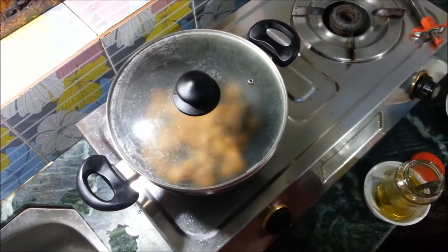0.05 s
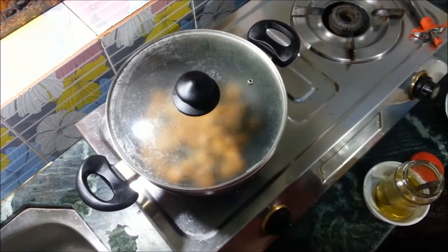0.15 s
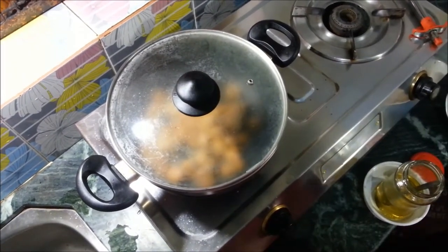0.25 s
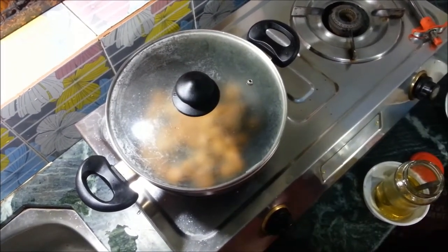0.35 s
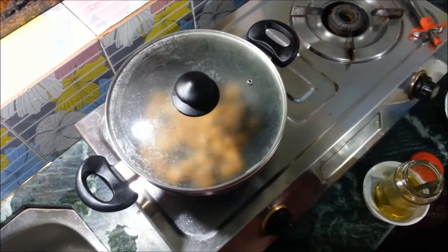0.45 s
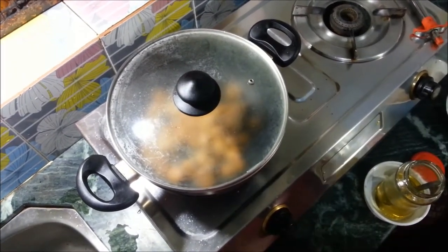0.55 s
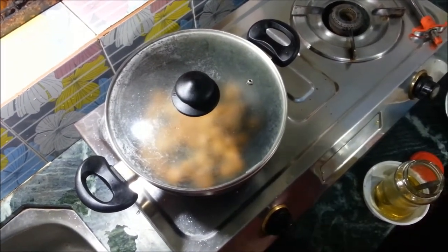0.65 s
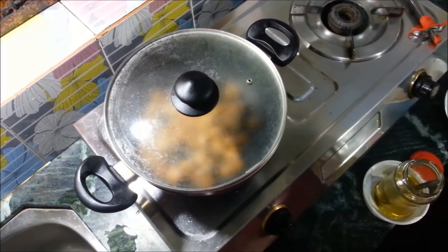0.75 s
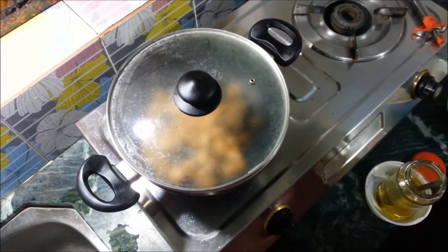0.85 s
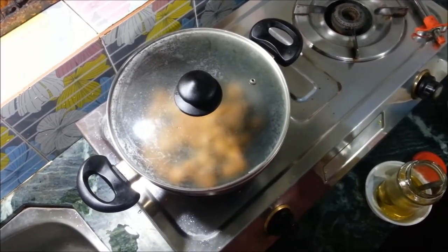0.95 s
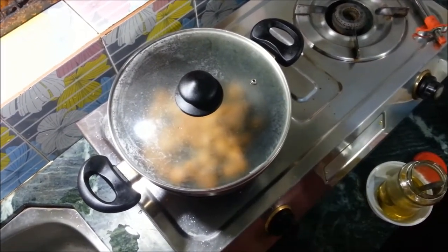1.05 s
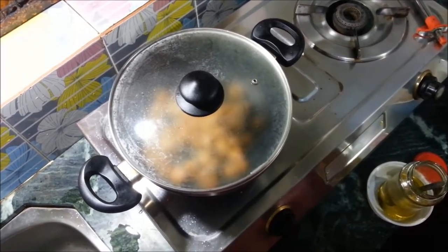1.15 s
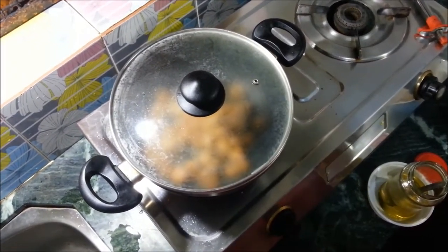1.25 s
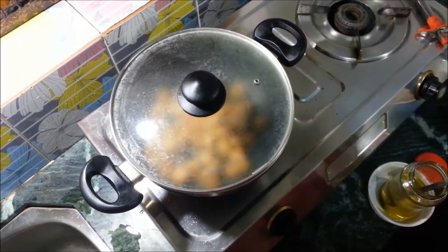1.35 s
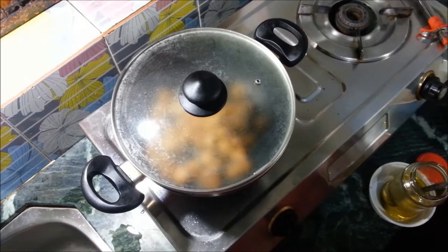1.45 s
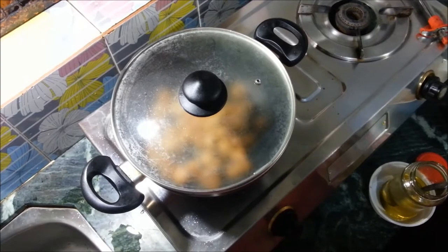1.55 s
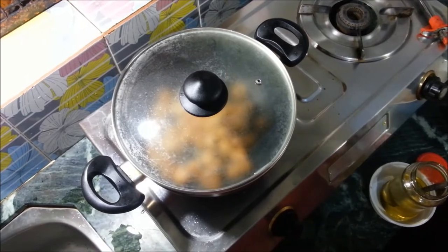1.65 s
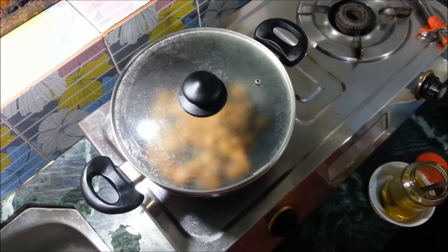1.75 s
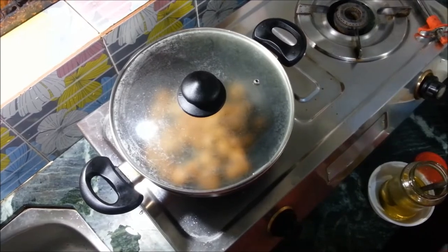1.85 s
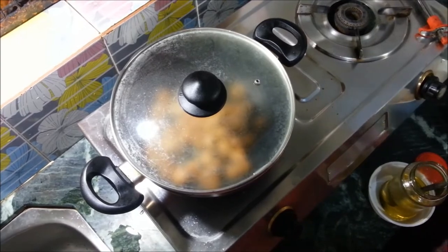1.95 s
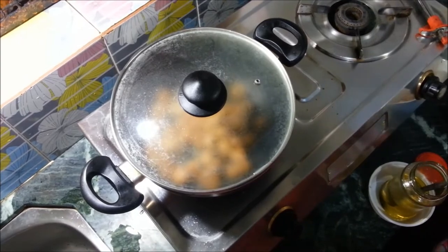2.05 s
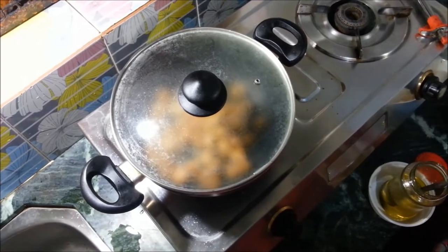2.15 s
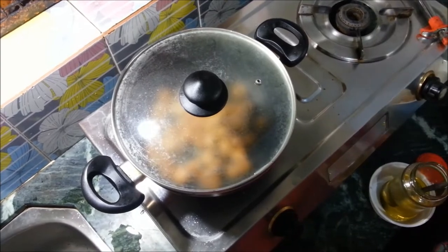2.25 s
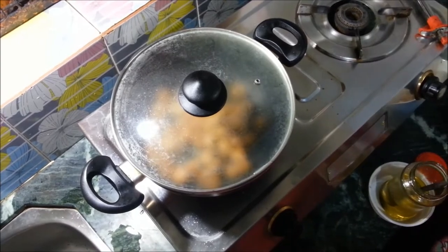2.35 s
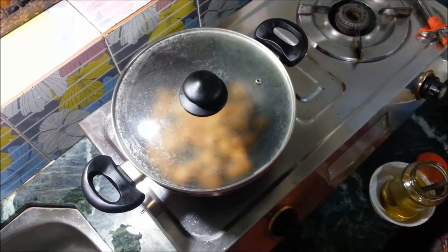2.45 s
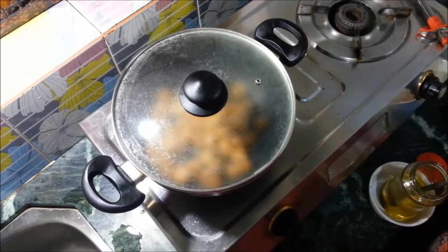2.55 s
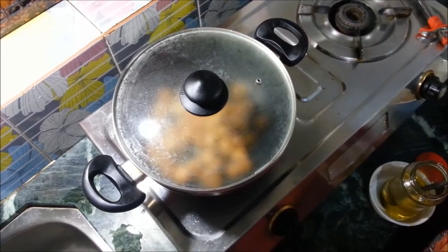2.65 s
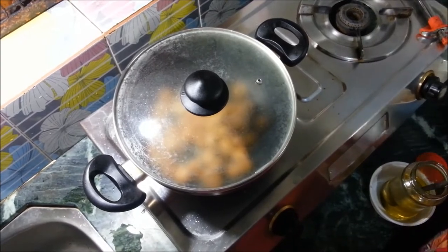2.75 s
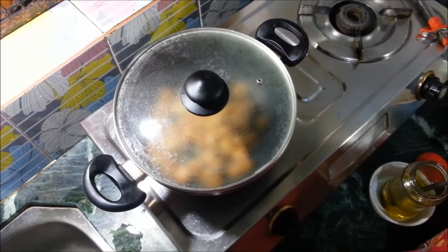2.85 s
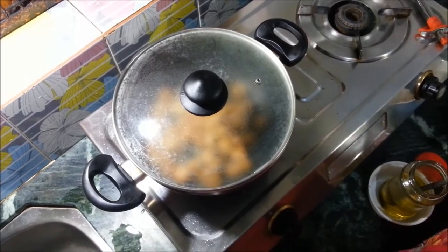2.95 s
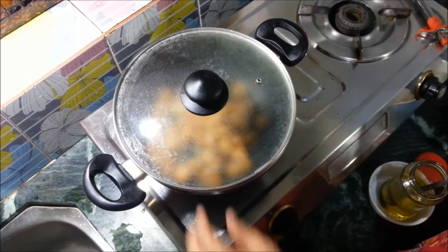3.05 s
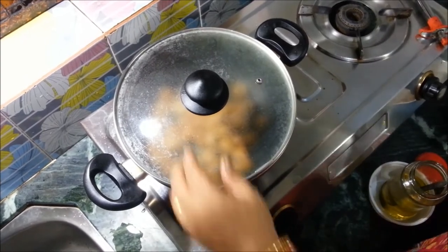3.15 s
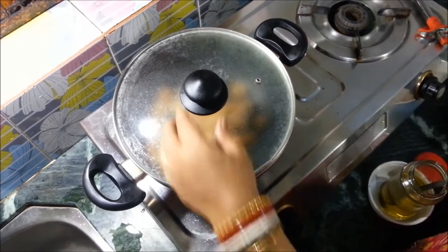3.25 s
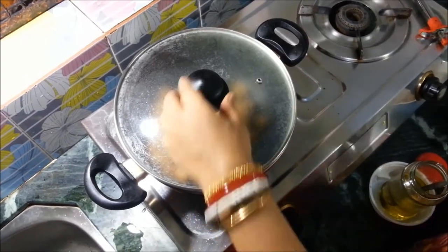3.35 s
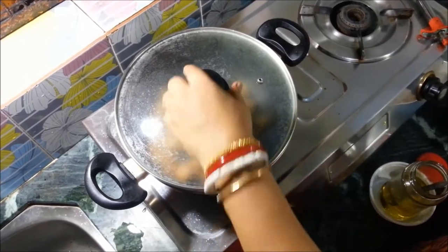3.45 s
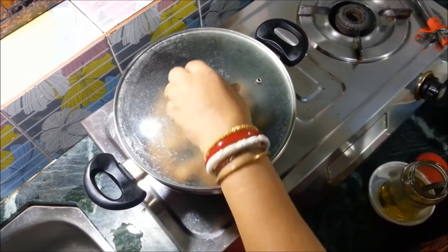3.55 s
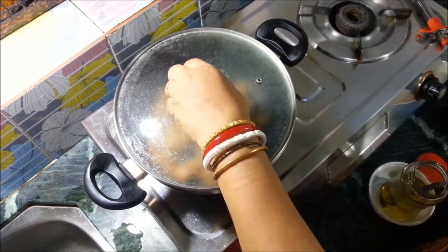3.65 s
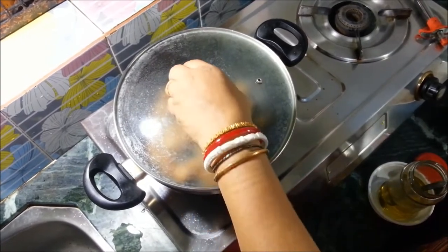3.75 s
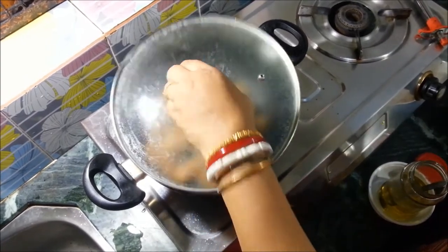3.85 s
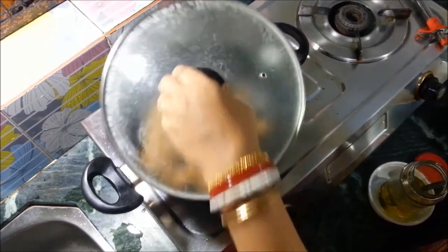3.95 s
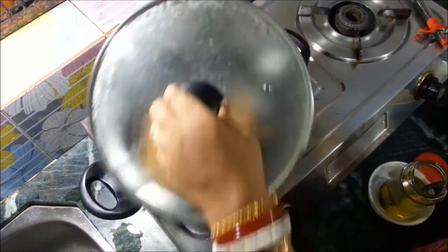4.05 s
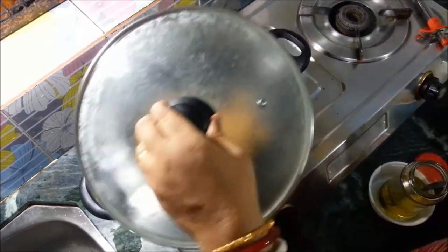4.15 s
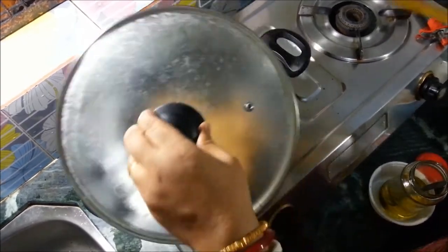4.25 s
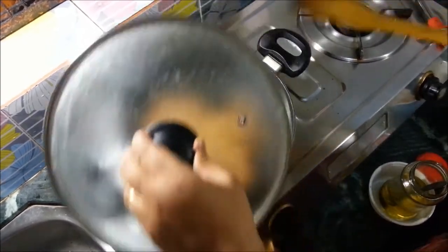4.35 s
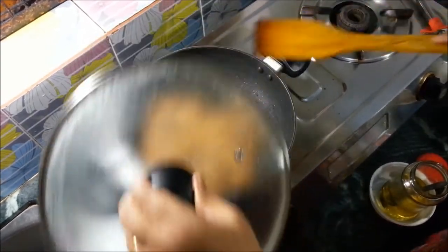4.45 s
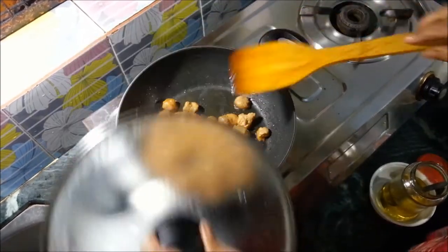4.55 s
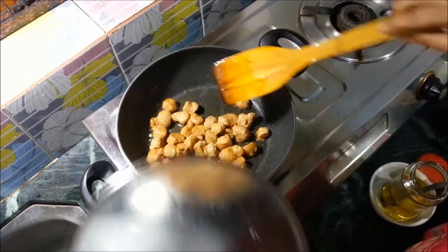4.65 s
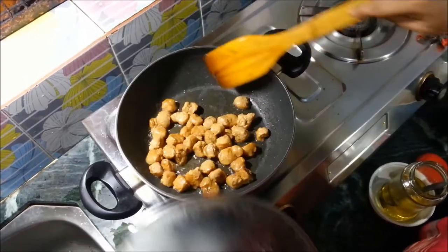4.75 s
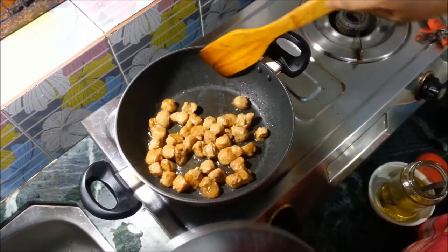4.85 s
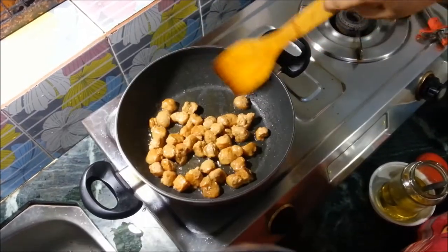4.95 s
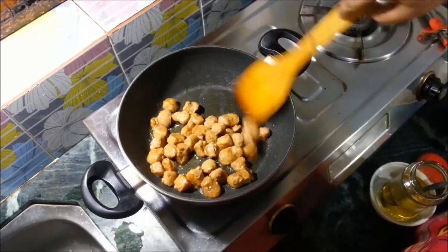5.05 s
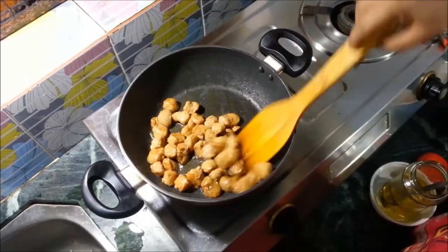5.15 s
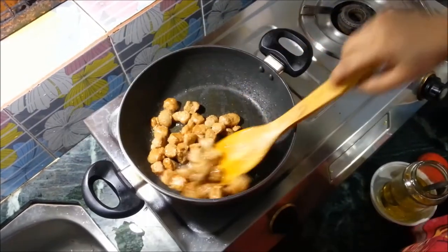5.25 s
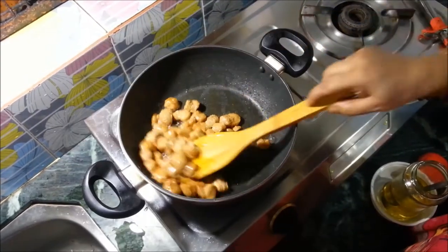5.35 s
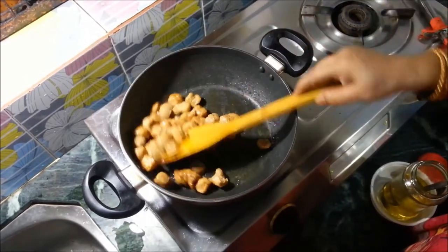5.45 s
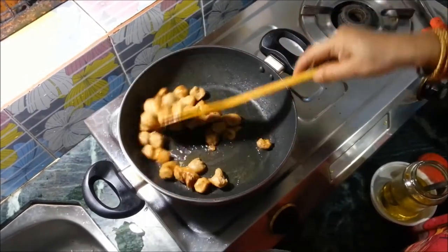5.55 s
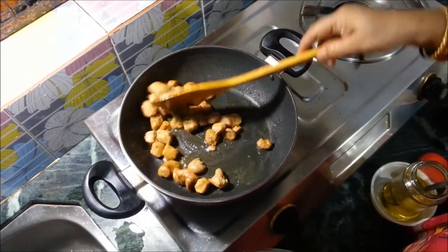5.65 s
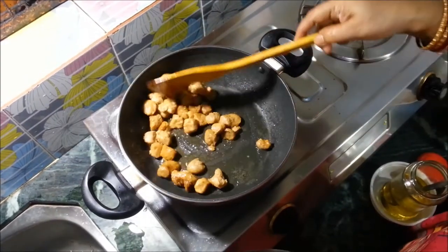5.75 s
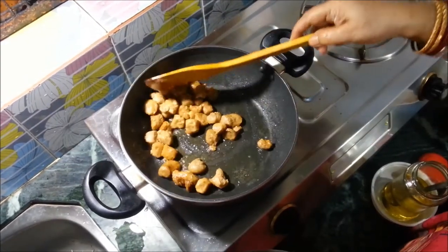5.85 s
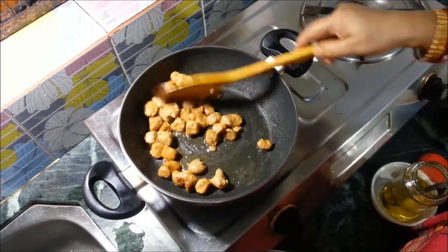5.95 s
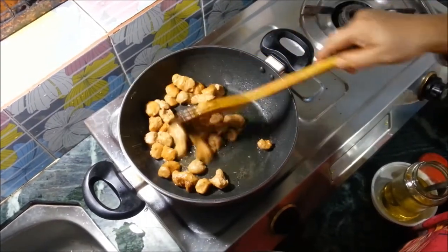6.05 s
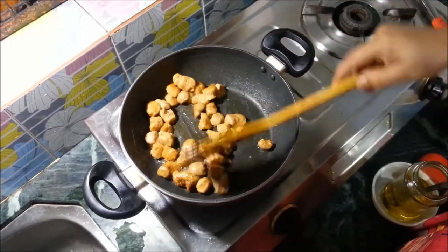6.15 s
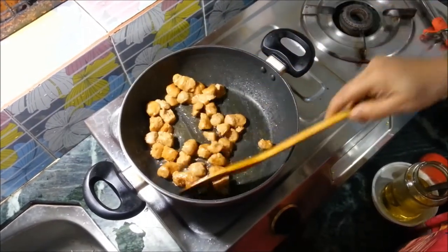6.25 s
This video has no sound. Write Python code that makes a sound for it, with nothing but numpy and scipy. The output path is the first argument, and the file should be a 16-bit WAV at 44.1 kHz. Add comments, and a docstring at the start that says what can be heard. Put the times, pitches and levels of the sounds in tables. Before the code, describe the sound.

From 0 to about 3.8 seconds, food fries under a glass lid, close to the microphone in a small tiled kitchen. The sizzle is low and enclosed, with a hollow bubbling resonance, irregular crisp spits, tiny pops and occasional short puffs of steam. A gas flame murmurs softly below, with faint low hum. At about 3.9 the trapped air sounds hollow and sweeps upward in pitch; around 4.0 to 4.2 the rim scrapes and the dome rings dull and brief. The sizzle opens up, louder and brighter, with hard snaps, the sharpest near 4.7 and 5.05. From about 4.9 to the end at 6.3, a wooden spatula knocks and rubs the pan in uneven strokes, chunks tumble, the stove top gives soft low booms, and the sizzle flares with each push. After 5.2 the flame murmur fades away.

```python
"""Soya chunks fry in shallow oil on a gas stove in a small tiled kitchen, close to a two-port microphone.
From the start, oil fizzes and spits under the glass lid: random pops and noise, over a filtered-noise flame.
Near 4 s the air under the lid rises in pitch, the rim scrapes, the dome rings and the sizzle opens up.
From about 5 s a wooden spatula knocks and rubs the pan, soft booms come from the stove top, and the sizzle
flares with each push; the flame's murmur sinks away after 5.2 s."""
import sys
import numpy as np
from scipy import signal
from scipy.fft import rfft, irfft
from scipy.io import wavfile
from scipy.ndimage import uniform_filter1d, minimum_filter1d

SR = 44100
rng = np.random.default_rng(int(sys.argv[2]) if len(sys.argv) > 2 else 0)


def inscribe(sig):
    """Save sig as 16-bit PCM at rate SR to the path in sys.argv[1].

    A 1-D sig is mono; a 2-D sig holds one channel per row.
    Samples are clipped to [-1, 1] before scaling.
    """
    pcm = np.round(np.clip(np.atleast_2d(sig).T, -1, 1) * 32767)
    wavfile.write(sys.argv[1], SR, pcm.astype(np.int16))


N = 278712
TIME, FREQS = np.arange(N) / SR, np.fft.rfftfreq(N, 1 / SR)


def amp(db):
    """Decibels to gain."""
    return 10 ** (np.asarray(db) / 20)


def unit(x):
    """Scales to an rms of one."""
    return x / np.sqrt(np.mean(x ** 2) + 1e-20)


def curve(rows, axis=1):
    """One column of a time table, at every sample."""
    rows = np.asarray(rows)
    return np.interp(TIME, rows[:, 0], rows[:, axis])


def spectrum(points, hz=FREQS):
    """Reads a table over log frequency."""
    f, value = np.transpose(points)
    return np.interp(np.log(hz + 1), np.log(f), value)


def shaped(x, response):
    """Filters by a frequency response."""
    return irfft(rfft(x) * response, N)


def resonance(hz, width_hz, at=FREQS):
    """Response of one damped resonance, with gain one at its centre."""
    return 1j * at * width_hz / (hz ** 2 - at ** 2 + 1j * at * width_hz)


def ring(x, modes, together=False):
    """Rings a set of modes, all by the same blows or each at its own moments."""
    total = 0
    for k, (hz, width_hz, db) in enumerate(modes):
        drive = (-1) ** k * x if together else np.roll(x, rng.integers(N), -1)
        total = total + amp(db) * shaped(drive, resonance(hz, width_hz))
    return unit(total)


def glide(x, hz, width_hz):
    """A steep resonance that follows a pitch curve: shift down to 0 Hz, low-pass, shift back."""
    turn = np.exp(2j * np.pi * np.cumsum(hz) / SR)
    r = np.exp(-np.pi * width_hz / SR)
    smooth = signal.lfilter([(1 - r) ** 2], [1, -2 * r, r * r], x / turn)
    return unit((turn * smooth).real)


def drift(rate_hz):
    """Random wandering of rms one."""
    return unit(shaped(rng.standard_normal(N), np.exp(-(FREQS / rate_hz) ** 2)))


def noise_pair(likeness):
    """White noise at the two ports, partly shared."""
    a, b = rng.standard_normal((2, N))
    return np.array([a, likeness * a + np.sqrt(1 - likeness ** 2) * b])


def add(mix, s, sound):
    """Mixes a stereo sound in at a time."""
    part = mix[:, max(round(s * SR), 0):][:, :sound.shape[1]]
    part += sound[:, :part.shape[1]]


def swells(times, fades, levels_db, rise):
    """Gain of overlapping swells: each power builds up to its peak, then dies away exponentially."""
    t = TIME[::32]
    u = (t[:, None] - times) / np.maximum(fades, .002)
    power = amp(levels_db) ** 2 * np.exp(-np.where(u < 0, (u / rise) ** 2, u))
    return np.interp(TIME, t, np.sqrt(power.sum(1) + 1e-16))


def flurries(per_s, decay_s, strength):
    """Gain of a bubbling spot: it flares at random moments and dies down."""
    kicks = np.minimum(rng.exponential(1, N), 3) * (rng.random(N) < per_s / SR)
    activity = signal.lfilter([1], [1, -np.exp(-1 / (decay_s * SR))], kicks)
    return unit(np.sqrt(1 + strength * activity))


def contacts(per_s, decay_s):
    """Gain of a run of tiny separate contacts: each starts at once and dies quickly."""
    kicks = rng.uniform(0.47, 1, N) * (rng.random(N) < per_s / SR)
    power = signal.lfilter([1], [1, -np.exp(-1 / (decay_s * SR))], kicks ** 2)
    return unit(np.sqrt(power + 1e-6))


def scatter(decay_s, wall, size=700):
    """Paths from one spot in the pan to the two ports: a first arrival, then reflections off the wall."""
    t = np.arange(size) / SR
    paths = rng.standard_normal((2, size)) * (np.exp(-t / decay_s) + wall * np.exp(-t / 0.0061))
    return paths / np.linalg.norm(paths, axis=1, keepdims=True)


# reverberation of the tiled room: (frequency [Hz], t60 [s])
ROOM_T60 = [(200, 0.077), (1000, 0.41), (4000, 0.19), (8000, 0.14), (15000, 0.16)]


def kitchen(x, wet_db, count=3):
    """Adds the short tail of the tiled room; tails take turns, so pops at different moments differ in path."""
    wet = np.zeros((2, N))
    for k in range(count):
        hz, t, z = signal.stft(rng.standard_normal((2, SR // 3)), SR, nperseg=256)
        decay = amp(-60 * t / spectrum(ROOM_T60, hz)[:, None]) * (t > .004)
        tail = signal.istft(z * decay, SR, nperseg=256)[1]
        turn = uniform_filter1d(1. * (np.arange(N) // 128 % count == k), size=32)
        wet += signal.oaconvolve(x * turn, tail / np.linalg.norm(tail[0]), axes=1)[:, :N]
    return x + amp(wet_db) * wet


# how far the pan is uncovered: (time [s], share [0-1])
OPENING = [(0, 0), (3.87, 0), (3.97, 0.3), (4.3, 0.56), (4.6, 0.46), (6.32, 0.73)]


def opening():
    """Uncovered share of the pan, which blends covered and open sound."""
    return np.clip(curve(OPENING), 0, 1)


def crackle(per_s, spread_db, tone_db, count=20):
    """Spots in the pan, each popping tiny bubbles of its own pitch in flurries."""
    out = np.zeros((2, N))
    for hz in np.geomspace(2400, 13000, count):
        size = amp(spread_db * np.minimum(rng.exponential(1, N), 3))
        pops = size * (rng.random(N) < per_s / count / SR)
        pops = pops * flurries(per_s=14, decay_s=0.0037, strength=5.8)
        pops = pops + amp(tone_db) * signal.lfilter(*signal.iirpeak(hz, 4, SR), pops)
        out += signal.oaconvolve(unit(pops)[None], scatter(decay_s=0.00028, wall=0.48), axes=1)[:, :N]
    return unit(out)


MIST_EDGE_HZ, MIST_DB = 9750, -3.5  # lower edge; level against the crackle


def mist():
    """The finest droplets hiss high up, in puffs of their own."""
    hiss = unit(shaped(noise_pair(.05), 1 / (1 + (MIST_EDGE_HZ / (FREQS + 1)) ** 8)))
    return amp(MIST_DB) * hiss * flurries(per_s=29, decay_s=0.0082, strength=19)


# steady sizzle before colouring: (time [s], relative level [dB])
STEADY_SIZZLE = [(0, -34), (0.8, -33), (1.7, -35.5), (3.35, -34.5), (3.55, -34.5), (3.87, -33), (3.95, -26),
                 (4.17, -24), (4.35, -22.5), (4.44, -25), (4.56, -24), (4.65, -24.5), (5.05, -25),
                 (5.22, -22), (5.38, -27), (5.62, -25), (5.9, -22.5), (6.32, -28.5)]
# drops of water bursting in the oil:
# (time [s], relative crack level [dB], pitch [Hz], spray decay [s], relative foam level [dB])
WATER_BURSTS = [(0.013, -25, 6940, 0.006, -30.5), (0.115, -24, 6910, 0.01, -32),
                (0.182, -19, 7000, 0.0058, -30.5), (0.236, -17, 7440, 0.007, -27),
                (0.31, -23, 7000, 0.008, -26.5), (0.391, -34, 7000, 0.006, -27.5),
                (0.578, -14, 6980, 0.009, -46), (0.665, -14, 7050, 0.006, -34),
                (0.709, -24, 7400, 0.005, -44), (0.744, -20, 7000, 0.0093, -38),
                (0.777, -16, 7000, 0.007, -30), (0.798, -16, 7000, 0.016, -44),
                (0.831, -14, 7800, 0.005, -34), (0.886, -22, 6700, 0.005, -48),
                (0.977, -18, 6730, 0.005, -28), (1.05, -27, 7000, 0.005, -29.5),
                (1.245, -8.5, 7600, 0.0057, -47), (1.4405, -17.5, 7010, 0.0027, -27),
                (1.58, -13.5, 7080, 0.012, -36), (1.675, -26, 7000, 0.005, -31.5),
                (1.84, -20, 6150, 0.0015, -50), (1.868, -16.5, 6900, 0.0082, -26.5),
                (1.935, -23, 7000, 0.005, -32), (2.049, -35, 7030, 0.005, -34),
                (2.08, -17, 7030, 0.005, -34.5), (2.184, -30, 5550, 0.008, -31.5),
                (2.232, -21, 7130, 0.0045, -39), (2.27, -17, 7120, 0.011, -31.5),
                (2.303, -15, 6900, 0.0072, -39), (2.322, -18, 6900, 0.008, -47),
                (2.426, -26, 4960, 0.005, -26), (2.4544, -9, 7070, 0.02, -35),
                (2.528, -17, 6830, 0.005, -51), (2.64, -19, 7000, 0.008, -36),
                (2.752, -27, 7470, 0.005, -34), (2.823, -28, 6500, 0.008, -32.5),
                (2.886, -17, 8500, 0.005, -30), (2.896, -16, 6820, 0.0079, -41),
                (3.151, -13, 10400, 0.0027, -34), (3.164, -17.5, 7020, 0.0045, -33),
                (3.219, -26, 6670, 0.015, -30.5), (3.327, -11, 6500, 0.0094, -41),
                (3.635, -16.5, 6750, 0.005, -34), (3.75, -32, 7000, 0.005, -28),
                (3.918, -8, 7160, 0.0082, -45), (4.186, -6.5, 7020, 0.0046, -38),
                (4.21, -9, 7000, 0.012, -36), (4.257, -9, 7000, 0.003, -25),
                (4.2804, -4.5, 5740, 0.0067, -27), (4.338, -6, 7000, 0.0099, -32),
                (4.365, -7, 7050, 0.006, -20), (4.464, -10, 7000, 0.0012, -43),
                (4.484, -2.5, 6700, 0.015, -25), (4.519, -8, 7000, 0.006, -39),
                (4.586, -11.5, 7000, 0.001, -47), (4.628, -13, 7000, 0.001, -45),
                (4.648, -13, 6960, 0.00091, -45), (4.7302, 7.5, 7850, 0.0032, -45),
                (4.768, -9, 7650, 0.006, -23), (4.802, -8, 7340, 0.003, -42), (4.81, -8, 7070, 0.005, -42),
                (4.8725, -10, 7900, 0.0011, -48), (4.8833, -5, 6800, 0.0015, -24),
                (4.9204, -8, 6950, 0.0015, -45), (4.937, -6, 7600, 0.005, -35),
                (4.954, -11, 6650, 0.0037, -28), (4.9715, 0, 8000, 0.0019, -45),
                (5.005, -7.5, 7300, 0.0011, -45), (5.0234, -8.5, 7700, 0.0012, -40),
                (5.0563, 1, 7400, 0.005, -18), (5.0735, -3, 7120, 0.0015, -45),
                (5.1131, -9, 7200, 0.0006, -47), (5.117, -3.5, 7450, 0.0007, -47),
                (5.348, -9, 10000, 0.001, -45), (5.354, -5, 6300, 0.004, -45),
                (5.369, -10, 7000, 0.0011, -40), (5.42, -12, 7000, 0.001, -32),
                (5.496, -8, 7000, 0.002, -32), (5.5522, -5.5, 7000, 0.00072, -45),
                (5.571, -7, 7000, 0.001, -48), (5.601, -5, 7000, 0.003, -45), (5.994, -3, 7350, 0.002, -45),
                (6.096, -1, 6960, 0.0029, -50), (6.153, -7, 6500, 0.0031, -36),
                (6.2023, -4, 7100, 0.003, -54), (6.2336, -6, 7000, 0.001, -45),
                (6.2699, -9, 7000, 0.001, -45), (6.3142, -5.5, 7000, 0.0012, -45)]
# pushes of the spatula: (time [s], power fade [s], relative rubbing level [dB],
# relative tumbling level of the chunks [dB], relative flare of the sizzle [dB])
SPATULA_PUSHES = [(4.94, 0.011, -35, -42, -23), (5.07, 0.032, -30, -38, -25.5),
                  (5.15, 0.016, -34, -53, -20), (5.212, 0.027, -26.5, -37.5, -15.5),
                  (5.295, 0.039, -31.5, -37.5, -17.5), (5.42, 0.052, -35, -45.5, -22.5),
                  (5.484, 0.049, -32, -36.5, -17), (5.585, 0.017, -40, -54, -23),
                  (5.69, 0.045, -32, -45.5, -16.5), (5.815, 0.042, -34, -41.5, -17),
                  (5.88, 0.0088, -36, -37.5, -30), (5.925, 0.026, -30, -53, -18.5),
                  (5.965, 0.029, -30.5, -46, -19.5), (6.042, 0.023, -30, -38, -19),
                  (6.081, 0.017, -35, -38, -15.5), (6.15, 0.012, -41, -43, -17.5),
                  (6.193, 0.008, -35, -38.5, -17), (6.245, 0.019, -37, -53, -21),
                  (6.299, 0.018, -50, -46, -20.5)]
FOAM_PEAK_S, FOAM_FADE_S = 0.003, 0.015  # delay of the foam after a spit; its power fade
FOAM_RISE, PUSH_RISE = 0.31, 0.83  # build-up, as a share of the fade


def frying_strength():
    """The steady sizzle, the foam after each spit, and the flare as a push brings wet chunks onto hot metal."""
    spit_s, *_, foam_db = np.transpose(WATER_BURSTS)
    push_s, fade_s, _, _, flare_db = np.transpose(SPATULA_PUSHES)
    foam = swells(spit_s + FOAM_PEAK_S, FOAM_FADE_S, foam_db, FOAM_RISE)
    flare = swells(push_s, fade_s, flare_db, PUSH_RISE)
    steady = amp(curve(STEADY_SIZZLE) + 1.0 * drift(6.3))
    return np.sqrt(steady ** 2 + foam ** 2 + flare ** 2)


# colour of the frying under the lid: (frequency [Hz], relative level [dB])
COVERED_COLOUR = [(100, -13), (300, -9), (600, -0.5), (950, -2), (2000, -2.5), (3500, -4), (5000, -3.5),
                  (8500, -4.5), (11000, -4), (14500, -9)]
# colour of the frying in the open: (frequency [Hz], relative level [dB])
OPEN_COLOUR = [(100, -57), (300, -14), (600, -9), (950, -7), (2000, -6), (3500, -4), (5000, -2.5),
               (8500, -1.5), (11000, -7.5), (14500, -16.5)]


def sizzle():
    """Crackle over a fine fizz; it grows louder and brighter as the lid comes off, and rings the open pan."""
    opened = opening()
    pops = crackle(per_s=8000, spread_db=3.5, tone_db=9.0)
    fizz = amp(-9) * noise_pair(.05)
    frying = (pops + fizz + mist()) * frying_strength()
    frying = frying * flurries(per_s=130, decay_s=0.01, strength=0.5)
    covered = shaped(kitchen(frying * (1 - opened), wet_db=-4.5), amp(spectrum(COVERED_COLOUR)))
    pan = 1 + amp(10.0) * resonance(1280, 216)
    uncovered = shaped(kitchen(frying * opened, wet_db=-1.0), amp(spectrum(OPEN_COLOUR)) * pan)
    return amp(-0.5) * covered + amp(-1.8) * uncovered


# air between pan and lid: (frequency [Hz], width [Hz], relative level [dB])
CAVITY_MODES = [(376, 5.4, 4), (486, 35, -7.5), (1142, 45, 1), (1370, 200, -8.5), (1791, 28, -1.5),
                (2190, 63, -6), (2320, 37, -7), (2460, 46, -5), (2598, 19, -7.5), (3080, 120, -7.5),
                (3755, 55, -4.5), (4450, 110, -8)]


def under_lid():
    """Bubbling rings the air trapped under the lid."""
    bubbling = amp(2 * drift(40))
    return ring(noise_pair(0.035) * bubbling, CAVITY_MODES) * amp(-42) * (1 - opening())


# gas flame colour: (frequency [Hz], relative level [dB])
FLAME_COLOUR = [(100, -52), (160, -11), (190, -13), (225, -3.5), (265, 2.5), (305, -4.5), (360, 3),
                (420, -7.5), (520, -9), (800, -15), (3000, -60)]
# flame as the microphone hears it, before flutter: (time [s], level [dB])
FLAME_LEVEL = [(0, -43.5), (3.8, -43.5), (4.5, -44.5), (5.2, -43), (5.7, -63), (6.32, -82)]
# low room sound: (time [s], level [dB])
HUM_LEVEL = [(0, -58.5), (2, -55.5), (3.8, -58), (4.1, -64), (5, -63), (5.95, -63), (6.32, -59)]
# colour of the rumble around the hum: (frequency [Hz], relative level [dB])
RUMBLE_COLOUR = [(20, -5), (45, -0.5), (75, 9.5), (105, 3.5), (135, 2.5), (170, -1), (230, -25), (600, -50)]
HUM_CENTRE_HZ, HUM_WANDER_HZ = 94, 1.004


def stove():
    """The fluttering murmur of the gas flame, with a faint wavering hum and rumble in the room."""
    flutter = amp(0.8 * drift(14))
    flame = unit(shaped(noise_pair(0.81), amp(spectrum(FLAME_COLOUR))))
    flame = flame * amp(curve(FLAME_LEVEL)) * flutter
    hum_hz = HUM_CENTRE_HZ + HUM_WANDER_HZ * drift(2.0)
    hum = unit(np.sin(2 * np.pi * np.cumsum(hum_hz) / SR) * amp(2 * drift(3.5)))
    rumble = unit(shaped(noise_pair(0.35), amp(spectrum(RUMBLE_COLOUR))))
    return flame + amp(curve(HUM_LEVEL)) * (amp(-4.0) * hum + rumble)


STRAY_PER_S, STRAY_DB = 110, -46  # mean rate; level before the band filter


def stray_pops():
    """Single small bubbles burst apart from the rest, heard while the lid keeps the fizz low."""
    pops = crackle(per_s=STRAY_PER_S, spread_db=-4, tone_db=12)
    return amp(STRAY_DB) * shaped(pops, resonance(7600, 5600)) * (1 - opening())


CRACK_WIDTH_HZ, OPEN_WIDTH_HZ = 2300, 1900  # width under the lid; what a fully open pan adds
TEAR = 2.6  # first snap in a fully open pan, against one pop of the spray
BUILD_UP = 0.5  # under the lid, time constant of the spray's gathering as a share of its decay


def spits(size=2048):
    """Each drop bursts with a snap and a quickly thinning spray of smaller pops; the lid blocks the direct snap."""
    out = np.zeros((2, N))
    t, f = np.arange(size) / SR, np.fft.rfftfreq(size, 1 / SR)
    for s, db, hz, decay_s, _ in WATER_BURSTS:
        opened = np.interp(s, *np.transpose(OPENING))
        decay_s = max(decay_s, .0005)
        pops = rng.choice([-1., 1.], size) * (rng.random(size) < 8000 / SR)
        spray = pops * np.exp(-t / decay_s)
        spray[0] = 1
        spray *= 1 - max(1 - 2 * opened, 0) * np.exp(-t / (BUILD_UP * decay_s))
        paths = scatter(decay_s=0.00038, wall=0.21 * (1 - opened))
        burst = signal.fftconvolve(spray[None], paths, axes=1)[:, :size]
        burst[:, 2] += TEAR * opened  # the film of oil tears
        burst = irfft(rfft(burst) * resonance(hz, CRACK_WIDTH_HZ + OPEN_WIDTH_HZ * opened, f))
        add(out, s, amp(db + 6.0) * burst / np.linalg.norm(burst[0]))
    return out


# larger bubbles that burst at a pitch: (time [s], level [dB], pitch [Hz], width before squaring [Hz])
PITCHED_PUFFS = [(0.242, -40, 4200, 1100), (.54, -45, 2160, 300), (1.04, -42, 2330, 300),
                 (1.442, -46, 2700, 1500), (1.872, -52, 2460, 1100), (2.111, -47, 1160, 400),
                 (2.392, -45, 5270, 700), (2.428, -44, 3470, 1200), (2.82, -38.5, 2480, 4200),
                 (3.223, -47, 1170, 400), (4.281, -29, 5760, 1100), (4.886, -36, 4700, 400),
                 (5.2, -32, 1850, 1400), (5.303, -33, 3870, 600), (5.348, -44, 6250, 400)]


def plops(size=3000):
    """Now and then a larger bubble lets out a short, pitched puff of steam."""
    out = np.zeros((2, N))
    t, f = np.arange(size) / SR, np.fft.rfftfreq(size, 1 / SR)
    for s, db, hz, width_hz in PITCHED_PUFFS:
        puff = rng.standard_normal((2, size)) * np.exp(-t / 0.021)
        add(out, s, amp(db) * unit(irfft(rfft(puff) * resonance(hz, width_hz, f) ** 2)))
    return out


# two lowest air resonances beneath the tipping lid:
# (time [s], lower pitch [Hz], upper pitch [Hz], level of the lower [dB])
LID_AIR = [(3.78, 370, 1160, -62), (3.85, 387, 1200, -45.5), (3.91, 424, 1220, -46),
           (3.96, 536, 1300, -39.5), (4.0, 567, 1320, -45), (4.06, 630, 1340, -44), (4.11, 715, 1330, -43),
           (4.2, 760, 1330, -54), (4.3, 760, 1330, -75)]
GAP_WIDTH_HZ, GAP_UPPER_DB = 58, -1.5  # width; upper against lower


def lid_gap():
    """The air under the lid sounds hollow and rises in pitch as the gap widens."""
    air = noise_pair(0.39)
    lower = glide(air, curve(LID_AIR, axis=1), GAP_WIDTH_HZ)
    upper = glide(air, curve(LID_AIR, axis=2), GAP_WIDTH_HZ)
    level = amp(curve(LID_AIR, axis=3)) * (TIME > LID_AIR[0][0])
    return (lower + amp(GAP_UPPER_DB) * upper) * level


SPATTER_PER_S, SPATTER_DB = 390, -8  # mean rate; level against the frying strength


def spatter(count=6):
    """Droplets snap in the open pan, each spot with its own brightness; they come harder as the sizzle flares."""
    out = np.zeros((2, N))
    for hz in np.geomspace(4500, 13000, count):
        sizes = amp(4 * np.minimum(rng.exponential(1, N), 2.5))
        ticks = shaped(sizes * (rng.random(N) < SPATTER_PER_S / count / SR), resonance(hz, hz))
        paths = scatter(decay_s=0.00008, wall=0.03)
        out += signal.oaconvolve(unit(ticks)[None], paths, axes=1)[:, :N]
    return amp(SPATTER_DB) * unit(out) * frying_strength() * opening()


# the lid catches on the pan as it slides off:
# (time [s], power fade [s], hollow dome ringing level [dB], rim scraping level [dB])
LID_SCRAPES = [(3.99, 0.0095, -54, -36), (4.055, 0.03, -45, -37), (4.118, 0.043, -30.5, -39)]
# glass dome: (frequency [Hz], width [Hz], relative level [dB])
DOME_MODES = [(150, 21, -13), (310, 24, 8.5), (490, 58, -13), (622, 18, 7), (760, 45, -3.5)]
# steel rim: (frequency [Hz], width [Hz], relative level [dB])
STEEL_RIM_MODES = [(1290, 70, -1), (1600, 96, -6)]
LID_RISE = 0.72  # build-up, as a share of the fade


def lid():
    """The steel rim scrapes off the pan, and the glass dome rings briefly, dull and hollow."""
    s, fade_s, dome_db, rim_db = np.transpose(LID_SCRAPES)
    rub = shaped(noise_pair(0.55) * amp(3.6 * drift(80)), 1 / (1 + (FREQS / 1800) ** 4))
    dome = ring(rub, DOME_MODES) * swells(s, fade_s, dome_db, LID_RISE)
    rim = ring(rub, STEEL_RIM_MODES) * swells(s, fade_s, rim_db, LID_RISE)
    return dome + rim


# the pan shifts on its stand: (time [s], level at the top of the swell [dB])
PAN_SHIFTS = [(4.858, -60), (4.935, -54), (5.039, -53), (5.09, -56), (5.315, -60), (5.409, -63),
              (5.98, -55), (6.062, -48), (6.112, -46.5), (6.174, -56), (6.233, -50), (6.278, -50)]
STOVE_TOP_HZ, THUD_RISE_S = 99, 0.0098  # nominal pitch, varied per thud; time to the top of the swell


def thuds(size=6000):
    """The sheet-steel stove top gives one short, soft boom each time the pan shifts."""
    out, t = np.zeros((2, N)), np.arange(size) / SR
    swell = t / THUD_RISE_S * np.exp(1 - t / THUD_RISE_S)
    for s, db in PAN_SHIFTS:
        hz = STOVE_TOP_HZ * rng.uniform(0.86, 1.07)
        boom = np.sin(2 * np.pi * (hz * t + rng.random()))
        add(out, s, amp(db) * np.sqrt(2) * np.array([boom, boom]) * swell)
    return out


# spatula against pan: (time [s], strength [dB], centre of the colour [Hz])
SPATULA_KNOCKS = [(4.932, -5.5, 810), (4.97, -13, 1600), (5.041, -13, 350), (5.059, -4, 1600),
                  (5.098, -6.5, 1290), (5.18, -24, 930), (5.207, -7, 710), (5.234, -10, 695),
                  (5.455, -14, 1400), (5.655, -6, 1000), (5.727, -7, 480), (5.762, -5, 560),
                  (5.784, -6, 1250), (5.816, -3, 1350), (5.854, -6, 650), (5.865, -8, 680),
                  (5.972, -12, 380), (6.078, -6, 1400), (6.128, -16, 1290), (6.186, -22, 480),
                  (6.2, -18, 1900), (6.229, -8, 1290), (6.242, -16, 760)]
# lower modes of the pan: (frequency [Hz], width [Hz], relative level [dB])
LOW_PAN_MODES = [(261.7, 17, 1.5), (367, 16, -2.5), (499, 10.7, 1.5), (594, 29, -29), (724, 22, -3.5),
                 (916, 60, -11)]
# upper modes of the pan: (frequency [Hz], width [Hz], relative level [dB])
HIGH_PAN_MODES = [(1170, 44, -12.5), (1310, 79, -11), (1500, 20, -8.5), (1870, 89, -22), (2280, 1500, -19)]
KNOCK_CONTACT_S, KNOCK_WIDTH_HZ = 0.0071, 750  # decay of the contact; colour width before squaring


def knocks(size=4096):
    """The wooden edge bumps the pan: a brief rough contact rings its modes, duller or brighter by where it lands."""
    out = np.zeros((2, N))
    t, f = np.arange(size) / SR, np.fft.rfftfreq(size, 1 / SR)
    pan = amp(-14)  # direct contact sound
    for k, (hz, width_hz, db) in enumerate([*LOW_PAN_MODES, *HIGH_PAN_MODES]):
        pan = pan + (-1) ** k * amp(db) * resonance(hz, width_hz, f)
    for s, db, hz in SPATULA_KNOCKS:
        a, b, shared = rng.standard_normal((3, size)) * np.exp(-t / KNOCK_CONTACT_S)
        contact = np.array([a, b]) + 0.92 * shared
        knock = irfft(rfft(contact) * pan * resonance(hz, KNOCK_WIDTH_HZ, f) ** 2)
        add(out, s, amp(db) * knock / np.linalg.norm(knock, axis=1, keepdims=True))
    return out


def spatula():
    """Wood rubs over the pan in tiny slips while the soft chunks bump against it."""
    s, fade_s, rub_db, tumble_db, _ = np.transpose(SPATULA_PUSHES)
    grip = contacts(per_s=170, decay_s=0.002)
    bumps = contacts(per_s=50, decay_s=0.005)
    slips = ring(noise_pair(0.27) * grip, HIGH_PAN_MODES, together=True)
    slips = slips * swells(s, fade_s, rub_db, PUSH_RISE)
    tumble = ring(noise_pair(0.61) * bumps, LOW_PAN_MODES, together=True)
    tumble = tumble * swells(s, fade_s, tumble_db, PUSH_RISE)
    return slips + shaped(tumble, 1 / (1 + (240 / (FREQS + 1)) ** 8))  # the pan is too small to radiate bass


def scene():
    """Everything at the stove."""
    frying = sizzle() + under_lid() + stray_pops() + spatter()
    bursts_and_knocks = kitchen(spits() + plops() + knocks(), wet_db=-14)
    return frying + bursts_and_knocks + stove() + lid_gap() + lid() + thuds() + spatula()


# moments when the bass of the whole mix is cut: (start [s], end [s])
BASS_CUTS = [(4.25, 4.4), (4.53, 4.59), (4.78, 4.86), (5.16, 5.32), (5.45, 5.95)]
BASS_CUT_DB, BASS_CUT_HZ = -48, 183  # gain of the bass during a cut; its upper edge


def cut_bass(x):
    """Cuts the bass below about 180 Hz at the listed times."""
    inside = sum((TIME > a) & (TIME < b) for a, b in BASS_CUTS)
    cut = uniform_filter1d(1. * inside, size=1500)
    bass = shaped(x, 1 / (1 + (FREQS / BASS_CUT_HZ) ** 10))
    return x - bass * cut * (1 - amp(BASS_CUT_DB))


CEILING_DB, RECOVERY_DB_PER_S = -1.5, 900
LOOKAHEAD_S, HOLD_S = 0.001, 0.016


def limiter(x):
    """Turns down just before a loud burst, holds for a moment, and recovers quickly; the sharpest tips clip."""
    ahead, hold = round(LOOKAHEAD_S * SR), round(HOLD_S * SR)
    power = abs(uniform_filter1d(x ** 2, size=16, axis=1))
    peak = np.sqrt(2 * power).max(0)  # of a sine with this short-term power
    spare_db = np.minimum(CEILING_DB - 20 * np.log10(peak + 1e-9), 0)
    over_db = -minimum_filter1d(spare_db, size=ahead + hold, origin=(hold - ahead) // 2)
    recovery_db = TIME * RECOVERY_DB_PER_S
    held_db = np.maximum.accumulate(over_db + recovery_db) - recovery_db
    return np.clip(x / amp(uniform_filter1d(held_db, size=ahead)), -.95, .95)


# left and right microphone port: (resonance [Hz], width [Hz], lift [dB])
PORT_RESONANCES = [(7070, 950, 16), (5690, 2080, 8)]
# balance of the ports: (frequency [Hz], left minus right [dB])
PORT_BALANCE = [(100, -0.5), (280, -3), (800, -1), (1350, -1.5), (2500, -3), (4000, 0), (6000, 1.5),
                (9000, -0.4), (14000, 0)]
BAND_EDGE_HZ = 14750


def record(dry):
    """Bass cuts; each port rings at its own pitch; a limiter dips around loud bursts; then the band limit."""
    ports = np.array([1 + (amp(db) - 1) * resonance(hz, width_hz) for hz, width_hz, db in PORT_RESONANCES])
    balance = amp(np.outer([.5, -.5], spectrum(PORT_BALANCE)))
    x = limiter(shaped(cut_bass(dry), ports * balance))
    lowpass = signal.firwin(401, BAND_EDGE_HZ, window=("kaiser", 9), fs=SR)
    return signal.oaconvolve(x, lowpass[None], "same")


dry = scene()
out = record(dry)
inscribe(out)
```